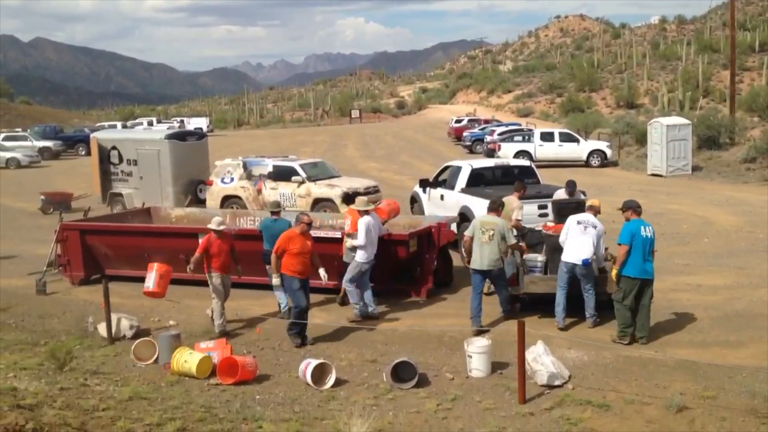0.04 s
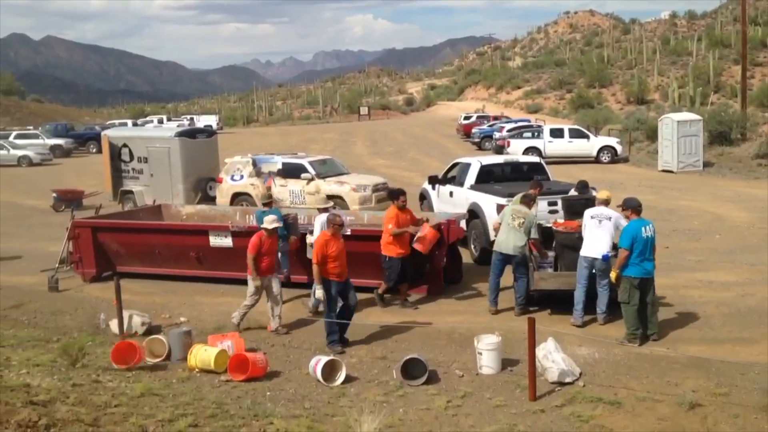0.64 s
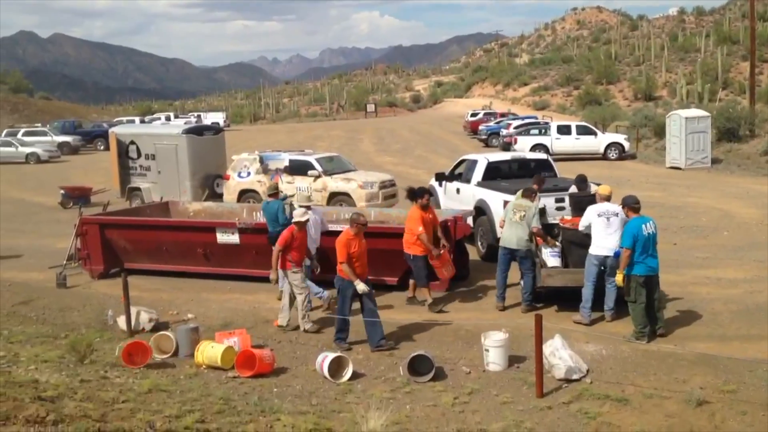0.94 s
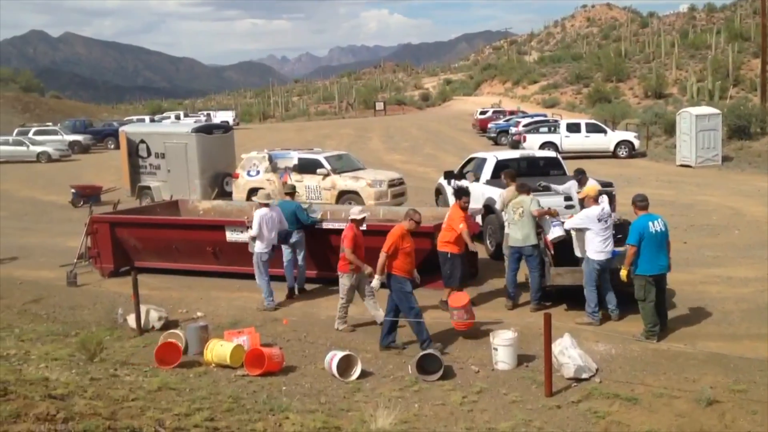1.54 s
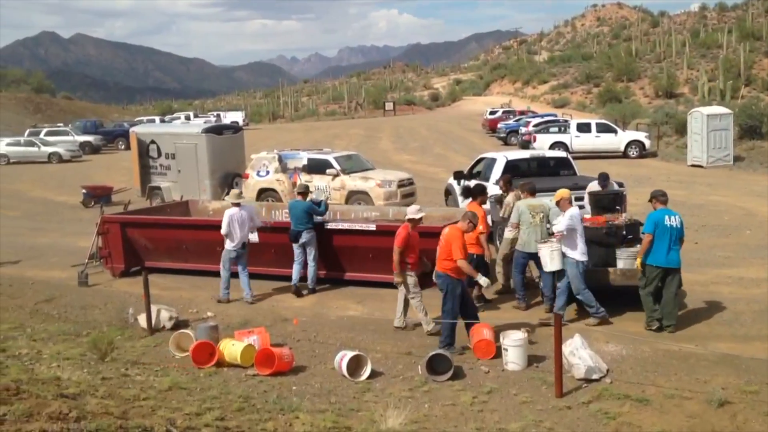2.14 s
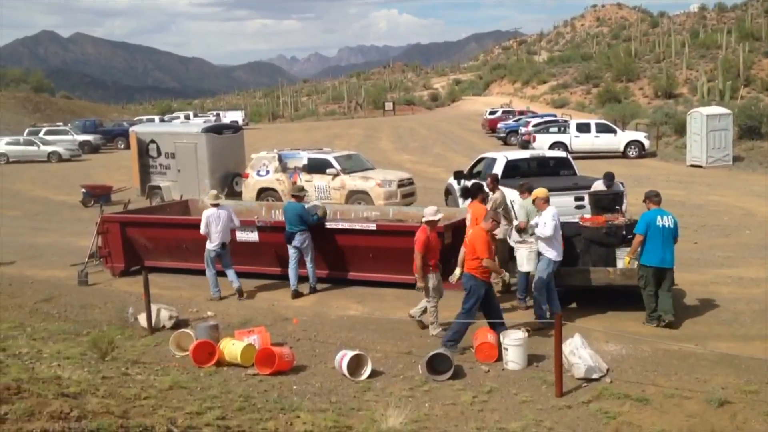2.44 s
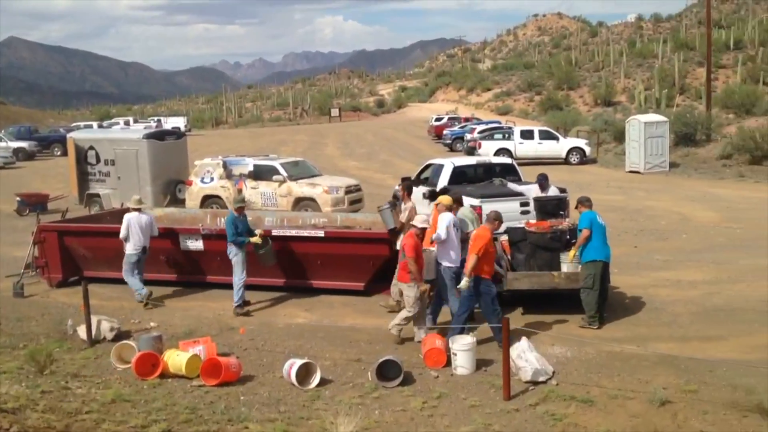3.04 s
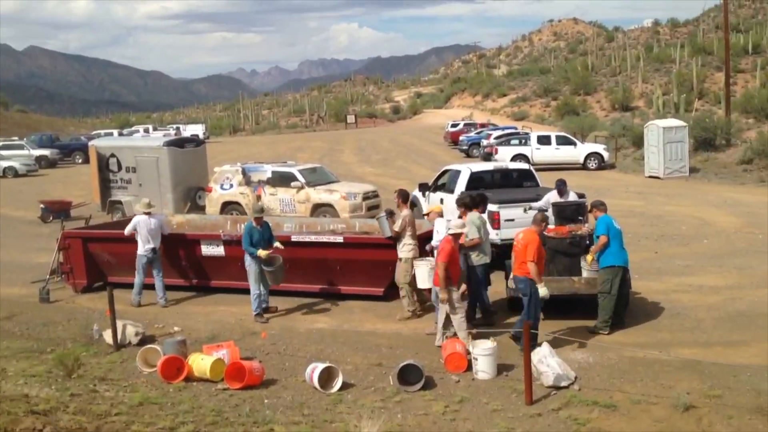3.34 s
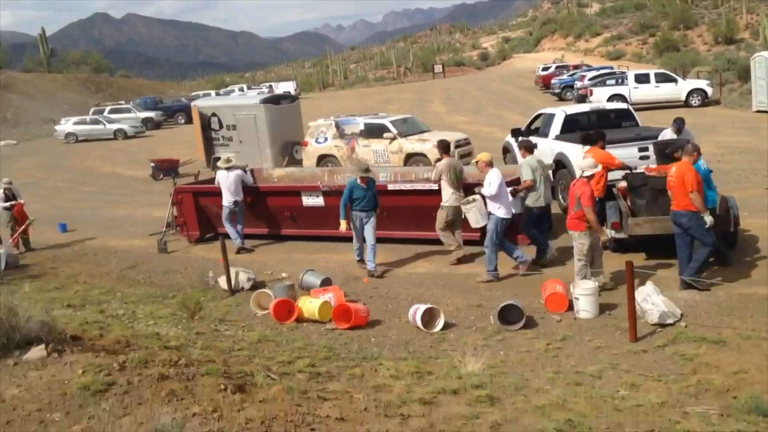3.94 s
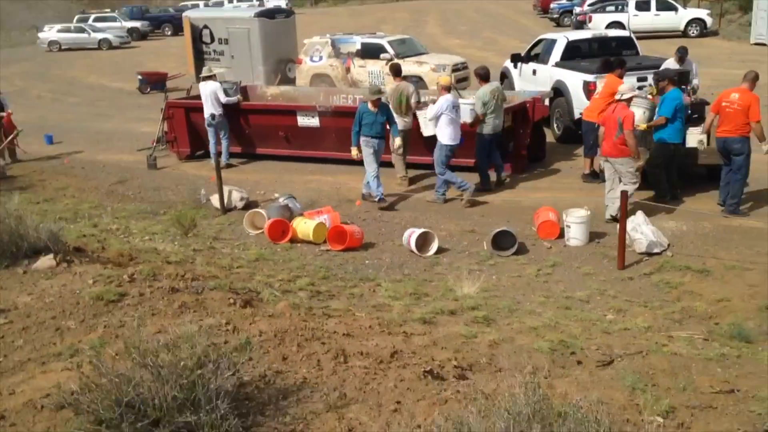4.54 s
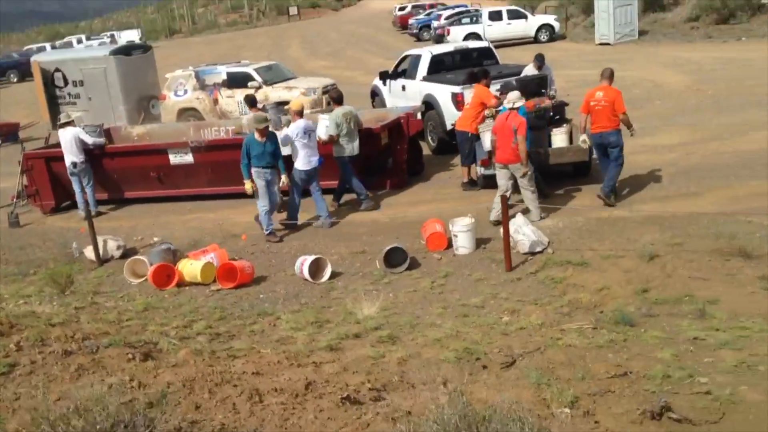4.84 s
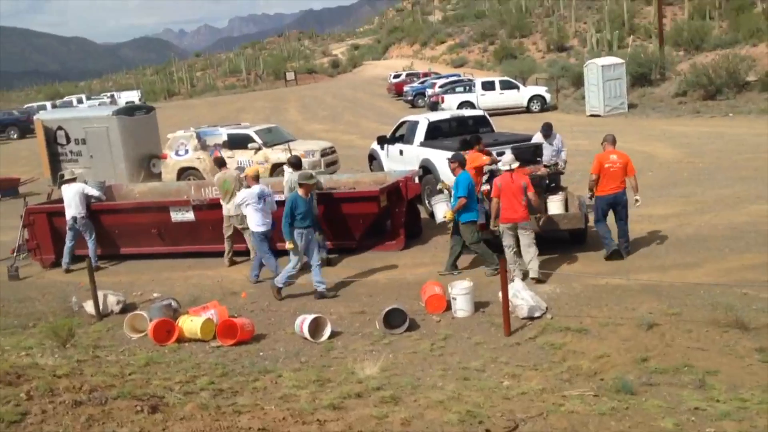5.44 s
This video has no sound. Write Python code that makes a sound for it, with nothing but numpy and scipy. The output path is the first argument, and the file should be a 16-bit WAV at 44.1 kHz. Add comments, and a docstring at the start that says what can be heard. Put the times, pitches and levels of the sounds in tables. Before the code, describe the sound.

Buckets of broken glass and trash are tipped into a metal dumpster outdoors, with clattering crashes, hollow thumps and light wind.

```python
"""Emptying buckets into a dumpster

An open dirt lot. Some way off, people tip plastic buckets of broken glass and trash into a steel
dumpster. Buckets bang on the rim and boom hollowly, the walls ring, trash rattles down and shards
slide and clink. Close up, a light wind rumbles and pops on the one microphone."""
import sys
import numpy as np
from scipy import signal
from scipy.fft import rfft, irfft
from scipy.io import wavfile
from scipy.ndimage import uniform_filter1d

SR = 44100
rng = np.random.default_rng(int(sys.argv[2]) if len(sys.argv) > 2 else 0)


def unload_audio(sound):
    """Save the sound as a 16-bit wav file, at the path given as the first command line argument."""
    columns = np.transpose(np.atleast_2d(sound))
    # keep every value between -1 and 1, then stretch to whole-number steps
    steps = np.round(np.clip(columns, -1, 1) * 32767)
    wavfile.write(sys.argv[1], SR, steps.astype(np.int16))


N = 246959
TIME = np.arange(N) / SR
AGE = np.arange(SR // 2) / SR  # seconds since a blow
GLASS, TRASH = 0, 1


def gain_of(db):
    """Decibels to gain."""
    return 10 ** (np.asarray(db) / 20)


def evened(x):
    """Scales to an rms of 1."""
    return x / np.sqrt(np.mean(x ** 2) + 1e-20)


def peaked(x, size=256):
    """Scales so that the loudest few milliseconds have an rms of 1."""
    return x / np.sqrt(uniform_filter1d(x ** 2, size).max() + 1e-20)


def tone(hz):
    """One undamped mode, set going by a blow."""
    return np.sin(2 * np.pi * hz * AGE)


def fade(t60):
    """Free decay after a blow, 60 dB down in t60 seconds."""
    return np.exp(-np.log(1000) * AGE / max(t60, 1e-3))


def add(mix, s, sound):
    """Mixes a sound in at time s."""
    part = mix[max(round(s * SR), 0):][:len(sound)]
    part += sound[:len(part)]


def band(x, lo, hi, order=4):
    """Causal band-pass from lo to hi Hz."""
    return signal.sosfilt(signal.butter(order, [lo, hi], "band", fs=SR, output="sos"), x)


def colour(x, spectrum, size=8192):
    """Minimum-phase filter through rows of f/Hz, gain/dB."""
    hz, db = np.transpose(spectrum)
    bin_hz = abs(np.fft.fftfreq(size, 1 / SR))
    log_gain = np.log(gain_of(np.interp(np.log(bin_hz + 1), np.log(hz + 1), db)))
    taps = np.fft.ifft(np.exp(signal.hilbert(log_gain).conj())).real[:size // 2]
    return signal.fftconvolve(x, taps)[:len(x)]


def drift(per_s):
    """Slow random wander of rms 1."""
    rolloff = 1 + (np.fft.rfftfreq(N, 1 / SR) / per_s) ** 4
    return evened(irfft(rfft(rng.standard_normal(N)) / rolloff, N))


def patter(per_s, spread_db):
    """Random tiny impacts, mostly small and a few large."""
    hits = (rng.random(N) < per_s / SR) * rng.choice([-1, 1], N)
    return hits * gain_of(spread_db * np.minimum(rng.exponential(1, N), 3.5))


def air(level_db=-63):
    """The steady, faint background of the open lot."""
    # spectrum of the open air: f/Hz, level/dB
    spectrum = [(18, -41), (30, -7), (77, 4), (197, -6.5), (410, -21), (656, -22.5), (830, -26),
                (970, -10.5), (1510, -22), (1820, -16.5), (2620, -22), (12300, -28), (15500, -27)]
    return gain_of(level_db) * evened(colour(rng.standard_normal(N), spectrum))


def breeze(lull_db=-72.5):
    """Strength of the wind: bell-shaped gusts over a steady breath of air."""
    # gusts at the microphone: crest t/s, half length/s, level/dB
    gusts = [(0.063, 0.1, -54), (0.567, 0.36, -53), (1.366, 0.091, -56), (1.822, 0.24, -54),
             (2.312, .1, -58), (3.077, 0.067, -57.5), (4.11, 0.24, -56.5), (4.681, 0.15, -50),
             (5.275, 0.28, -59.5), (5.575, 0.16, -60)]
    power = sum(gain_of(db) ** 2 * np.exp(-2 * ((TIME - s) / half_s) ** 2) for s, half_s, db in gusts)
    return np.sqrt(gain_of(lull_db) ** 2 + power)


def wind(gain_db=5.5):
    """Low rumble on the microphone that follows the breeze, in soft buffets with lulls between."""
    # spectrum of the rumble: f/Hz, level/dB
    spectrum = [(12, -27), (20, -40), (54, -2), (81, -3), (145, -5.5), (255, -18), (354, -22), (414, -33),
                (492, -44), (600, -24.5), (780, -39), (1320, -120)]
    buffets = np.minimum(gain_of(4.5 * drift(per_s=13)), 2)
    rumble = colour(rng.standard_normal(N) * buffets, spectrum)
    return gain_of(gain_db) * breeze() * evened(rumble)


def thumps(lead_s=0.037, lean_rad=0.067, tail_t60=0.13):
    """Wind pops on the microphone and a few dull bucket thuds: one pressure swing, then a noisy tail."""
    # low thumps: t/s, level/dB, centre f/Hz
    pulses = [(0.13, -29, 136), (0.144, -30.5, 122), (.216, -34.5, 130), (0.457, -27.5, 108),
              (0.469, -26, 61), (0.514, -28.5, 190), (.56, -35, 68), (0.873, -35, 97), (1.036, -29, 105),
              (1.038, -27.5, 346), (1.349, -37.5, 90), (1.518, -38, 78.7), (2.144, -23, 100),
              (2.389, -34.5, 99), (2.985, -43.5, 96), (3.5, -44.5, 92.3), (3.793, -41.5, 108),
              (4.191, -33, 79.6), (4.61, -15, 102), (4.61, -16.5, 334), (4.663, -26.5, 128),
              (4.849, -44, 90), (4.923, -35, 99), (5.148, -37, 142), (5.222, -32.5, 78.6),
              (5.366, -35.5, 73.7), (5.495, -34, 99.7)]
    out = np.zeros(N)
    for s, db, hz in pulses:
        swing = (np.exp(1j * lean_rad) / (1 - 1j * np.pi * hz * (AGE - lead_s)) ** 3).real
        tail = evened(band(rng.standard_normal(len(AGE)), hz / 2, 2 * hz, order=2)) * fade(tail_t60)
        tail_db = -14.5 - 5 * np.log2(hz / 100)  # higher thumps leave less
        add(out, s - lead_s, gain_of(db) * swing)
        add(out, s, gain_of(db + tail_db) * tail)
    return band(out, 50, 900, order=3)


def lot(x, echo_db=-16, t60=0.3, build_s=0.0053):
    """Adds faint scattered echoes from the dumpster, the parked vehicles and the slope."""
    scatter = band(rng.standard_normal(len(AGE)), 216, 7600, order=1)
    tail = scatter * fade(t60) * (1 - np.exp(-AGE / build_s))
    return x + gain_of(echo_db) * signal.fftconvolve(x, tail / np.linalg.norm(tail))[:N]


def poured(kind):
    """Flow of GLASS or TRASH: each load swells steadily, then dies away."""
    # loads sliding out of a bucket: t/s, swell/s, settling t60/s, glass level/dB, trash level/dB
    pours = [(0, 0.008, 0.99, -72, -48.5), (0.343, 0.034, 0.59, -53.5, -33.5), (.58, 0.16, 2.2, -66, -53),
             (.93, 0.27, 1, -63.5, -57), (1.308, 0.051, 4.6, -59.5, -57.5), (1.699, 0.16, 0.64, -51, -44.5),
             (1.92, 0.083, 1.63, -55.5, -46.5), (2.12, 0.054, 0.87, -70, -42), (2.86, 0.26, 0.74, -88, -64),
             (3.52, 0.096, 0.83, -63.5, -58), (3.98, 0.091, 2.46, -64.5, -56), (4.72, 0.21, 1, -69.5, -55),
             (5.32, 0.02, 2.5, -61.5, -55.5), (5.48, 0.089, 1, -63.5, -53)]
    handling_db = {GLASS: -79, TRASH: -68}  # faint stir of carried buckets between pours
    power = gain_of(handling_db[kind]) ** 2
    for start, swell_s, t60, *levels_db in pours:
        age = TIME - start
        swell = np.clip(age / swell_s, 0, 1)
        settle = np.exp(-np.log(1000) * np.maximum(age - swell_s, 0) / t60)
        power = power + (gain_of(levels_db[kind]) * swell * settle) ** 2
    return np.sqrt(power)


def tumble(gain_db=-3):
    """Clumps of small dull impacts as the trash settles."""
    # spectrum of tumbling trash: f/Hz, level/dB
    spectrum = [(210, -1), (350, -4), (516, 2.5), (706, 1), (800, 3), (1120, -0.5), (1560, 0.5), (2050, 0),
                (2630, -12), (3260, -10), (5180, -12.5), (6100, -17), (7000, -40), (9100, -68),
                (15400, -120)]
    hits = patter(per_s=1400, spread_db=3) * gain_of(3.2 * drift(per_s=25))
    return gain_of(gain_db) * poured(TRASH) * evened(colour(hits, spectrum))


def slide(clump_db=2, count=90):
    """Many shards, damped by the heap, tick against each other over a gritty scrape."""
    # tone colour of sliding glass: f/Hz, gain/dB
    spectrum = [(1470, -19.5), (2500, 5.5), (2660, -3.5), (3240, -3), (5280, -6.5), (6110, -6.5),
                (6900, -5), (11800, -12.5), (15500, -22)]
    rings = np.zeros(N)
    for hz in rng.uniform(2778, 14000, count):
        shard = tone(hz) * fade(rng.uniform(.012, .06))
        rings += signal.oaconvolve(patter(per_s=22, spread_db=3), shard[:SR // 10])[:N]
    grit = evened(rings) + 1.6 * evened(patter(per_s=2500, spread_db=4))
    clumps = gain_of(clump_db * drift(per_s=33))
    return poured(GLASS) * evened(colour(grit * clumps, spectrum))


def glints(gain_db=6, spread_db=2, t60=.07, lo_hz=5000, hi_hz=13000, count=45):
    """Loose shards ring out over the slide, more often and louder the faster the glass flows."""
    flow, out = poured(GLASS), np.zeros(N)
    fallen = np.cumsum(flow ** 1.5)
    for when, pitch, softness in rng.random((count, 3)):
        at = np.searchsorted(fallen, when * fallen[-1])
        ring = tone(lo_hz * (hi_hz / lo_hz) ** pitch) * fade(t60)
        add(out, at / SR, flow[at] * gain_of(gain_db + spread_db * np.log(1 - softness)) * ring)
    return out


def clinks(gain_db=-5, overtone_ratio=1.3, overtone_db=-15, flight_s=.032, flight_shrink=.8):
    """A shard rings in a beating pair of modes and an inharmonic overtone at each quickening bounce."""
    # dropped shards: t/s, level/dB, f/Hz, t60/s, change per bounce/dB
    shards = [(1.228, -56, 3710, .05, -24.5), (1.320, -56, 7800, 0.18, -20), (1.477, -61, 4514, .1, -10.5),
              (1.959, -39.5, 4760, 0.058, -25), (1.96, -42.5, 5960, .09, -25),
              (2.073, -37.5, 8900, .054, -21.5), (2.405, -32.5, 6370, 0.022, -27),
              (4.023, -31, 3970, 0.074, -38), (5.353, -50.5, 6490, 0.079, -3.5),
              (5.383, -50, 4440, 0.099, 1), (5.514, -53, 7860, .15, -10), (5.525, -51.5, 5300, .09, -17),
              (5.530, -51.5, 9050, .14, -12), (5.533, -55, 11650, .14, -10)]
    out = np.zeros(N)
    for s, db, hz, t60, bounce_db in shards:
        beat_hz = 70 * rng.uniform(0.71, 1.9)
        ring = tone(hz) + .5 * tone(hz + beat_hz) + gain_of(overtone_db) * tone(hz * overtone_ratio)
        for k in range(3):
            add(out, s, gain_of(db + gain_db + k * bounce_db) * ring * fade(t60))
            s += flight_s * flight_shrink ** k
    return out


def steel(x, ring_db=-14):
    """The dumpster's walls ring on after whatever hits them."""
    # modes of the steel walls: f/Hz, level/dB, t60/s
    wall_modes = [(684, 0, .3), (803, 0, .3), (845, -4, .25), (943, -4, .25), (1222, 0, .3), (1351, -5, .3),
                  (1475, 0, .3), (1750, -2, .25), (1840, -2, .3), (1925, -4, .25), (2034, 0, .3),
                  (2068, -3, .3), (2165, -5, .25), (2218, -5, .3), (2368, 0, .3), (2457, 1, .3),
                  (2490, 1, .3), (3277, -1, .25), (3403, -1, .25), (3597, -1, .25), (3980, 1, .25)]
    ring = sum(gain_of(db) * fade(t60) * np.cos(2 * np.pi * hz * AGE) for hz, db, t60 in wall_modes)
    return x + gain_of(ring_db) * x.std() * evened(signal.fftconvolve(x, ring)[:N])


def own_modes(lo_hz, hi_hz, count=40):
    """Every piece of trash has its own scatter of resonances, here a quarter of a second long."""
    hz = np.exp(rng.uniform(np.log(lo_hz), np.log(hi_hz), count))
    cycles = hz[:, None] * AGE[:SR // 4] + rng.random((count, 1))
    return evened(np.sin(2 * np.pi * cycles).sum(0))


def contact(clang_db, weight_db, bright_db, t60, height, rise_s, crush_t60=0.034):
    """A brief gritty crush; then the piece rings and scatters between the walls."""
    # edges of the body, clang, crack and splinter bands: f/Hz
    edges = [380, 1400, 2600, 6000, 15500]
    # tone colour of a knock: f/Hz, gain/dB
    spectrum = [(240, -19.5), (400, -7.5), (452, 0), (527, 0.5), (715, -2), (860, 4), (1150, -2.5),
                (1240, -2.5), (1660, -2), (2090, 3.5), (2630, -9.5), (3510, -7), (5480, -19),
                (13900, -36.5), (15500, -45)]
    # the ground echo lifts the bass and cancels the low mids of a sound at rim height: f/Hz, gain/dB
    ground_dip = [(330, 7), (500, -13.5), (690, -15), (870, -0.5)]
    crack_db = -5.5 + 13.5 * np.tanh(bright_db / 14.5)  # follows the brightness, then levels off
    levels_db = clang_db - 1 + np.array([weight_db, 0, crack_db, bright_db - 15.5])
    lives = t60 * np.geomspace(1, 0.85, len(levels_db))  # the treble dies sooner
    grit = rng.standard_normal(len(AGE)) * rng.exponential(1, len(AGE)) ** 0.71
    ring = np.zeros(len(AGE))
    add(ring, 0, .5 * own_modes(600, 7000))
    scatter = gain_of(-3) * (.7 * grit + ring)
    give = 1 - np.exp(-(AGE + 1 / SR) / rise_s)  # soft things take longer to load
    sound = np.zeros(len(AGE))
    for k, (db, life) in enumerate(zip(levels_db, lives)):
        force = grit * fade(crush_t60) + scatter * fade(life)
        force[0] += 4
        part = band(colour(force * give, spectrum), *edges[k:k + 2])
        sound += gain_of(db) * peaked(part)
    return colour(sound, [(hz, db * height) for hz, db in ground_dip])


def scrapes(rise_s=0.0081):
    """Buckets and loads drag over the rim or the ground: contacts that swell slowly."""
    # drags: t/s, clang level/dB, body over clang/dB, brightness/dB, t60/s, height (0 ground, 1 rim)
    drags = [(.297, -58.5, 4.5, 2, 0.39, 1), (.826, -56, -0.5, -2, 0.13, 0.72),
             (1.142, -56, -1.5, 3, 0.29, 0.91), (1.223, -54.5, -13, 3, 0.14, 0.88),
             (2.123, -42, 3.5, -5, 0.15, 0.24), (2.735, -62, 3, 4, 0.051, 1), (3.045, -63, 3, -6, 0.063, 1),
             (3.24, -62.5, 4, -4, .08, 1), (3.855, -60.5, 21, 6, 0.24, 0.17),
             (4.133, -41.5, -1, -7, .17, 0.35), (4.275, -56.5, -14, 9, 0.23, 1),
             (4.455, -47, 0.5, 2.5, 0.13, 0.35), (4.767, -49, 0, 0, 0.19, 1),
             (4.884, -64.5, -1, 3, 0.18, 1), (4.985, -64, 2, 7, 0.093, 0.88),
             (5.188, -65, 5.5, 8, 0.19, 0.73)]
    out = np.zeros(N)
    for s, *drag in drags:
        add(out, s, contact(*drag, rise_s))
    return out


def knocks():
    """Buckets and trash strike; harder, brighter knocks load faster."""
    # blows: t/s, clang level/dB, body over clang/dB, brightness/dB, t60/s, height (0 ground, 1 rim)
    blows = [(.055, -54.5, 11.5, 4, 0.035, 0), (.079, -58.5, 3, 14, 0.048, 0),
             (.109, -60, 16.5, 10, 0.035, 0), (.244, -58, 5, 6.5, 0.15, 0.68),
             (.350, -30.5, -7, -3.5, 0.36, 1), (.374, -29, -1.5, -0.5, 0.098, 0.97),
             (.386, -43, -18, 13, 0.19, 0.96), (.413, -35, -3, 1.5, 0.13, 1),
             (.587, -38.5, 0, 3.5, 0.11, 1), (.610, -40.5, 5.5, 2, 0.13, 1),
             (.629, -48.5, -11, 6.5, 0.17, 0.85), (.672, -44, 3, 0, 0.064, 0.9),
             (.720, -43.5, 4, -2.5, 0.26, 0.94), (0.779, -45.5, 1.5, 5, 0.083, 1),
             (0.922, -54, 2, 4, 0.4, 0.18), (.962, -61.5, 7, 21, 0.18, 0.37),
             (1.02, -52, 0.5, -14, 0.29, 0.35), (1.590, -49, 0.5, 7.5, 0.34, 0.95),
             (1.705, -34, 4.5, 2.5, 0.074, 1), (1.713, -34, 3.5, 2, 0.29, 1),
             (1.739, -32.5, -4, 5.5, 0.11, 0.96), (1.751, -35, 3.5, -1, 0.087, 1),
             (1.767, -35.5, -2.5, -8, 0.023, 1), (1.808, -50, 4, 5.5, .12, 0.37),
             (1.972, -57.5, 12.5, 12, 0.16, 0), (2.070, -47.5, 4.5, 2, 0.21, 1),
             (2.138, -45, 11, 5.5, 0.093, 0), (2.147, -54, 17, 22, 0.16, 0),
             (2.183, -43, 6.5, -21, 0.12, 1), (2.198, -54, 9.5, -12, 0.39, 1),
             (2.251, -46, 6.5, -5, 0.24, 1), (2.279, -50, 5.5, -4, 0.15, 1),
             (2.314, -47.5, 3.5, -3, 0.099, 0.65), (2.404, -56.5, -5, 34, 0.17, 0.52),
             (2.447, -44.5, -1.5, -10, 0.055, 0.29), (2.578, -35, -6, 4, 0.12, 0.29),
             (3.015, -57, 2, 1, 0.033, 0.92), (3.076, -64.5, 12, 1, 0.024, 1),
             (3.684, -62.5, 15.5, 14.5, 0.081, 0.47), (3.734, -60, 6.5, 4, 0.029, 0.43),
             (3.886, -41, 0, -0.5, 0.45, 1), (3.921, -35, 1, -0.5, 0.13, 0.89),
             (3.944, -42, 2.5, 2.5, .13, 0), (3.975, -43.5, 3, -5, 0.16, 1),
             (4.023, -42, -11, 15.5, 0.12, 0), (4.093, -48.5, -3, -19, 0.57, 0.82),
             (4.157, -41, -0.5, 3, .14, 0), (4.304, -49.5, 2.5, -1.5, 0.096, 0.33),
             (4.454, -46.5, 0.5, 9.5, 0.052, 0.15), (4.739, -54, 5.5, 8, 0.2, 0.32)]
    out = np.zeros(N)
    for s, clang_db, weight_db, bright_db, t60, height in blows:
        rise_s = 0.0013 * 2 ** ((-38 - clang_db - bright_db) / 25)
        add(out, s, contact(clang_db, weight_db, bright_db, t60, height, rise_s))
    return out


def rim(t60=.035, rise_s=0.00051):
    """The stiff rim gives a short ping from a close pair of modes."""
    # hard blows on the dumpster's rim: t/s, level/dB, f/Hz
    blows = [(0.3511, -21, 2008), (0.3542, -27, 2150), (0.3755, -23, 2170), (0.3870, -28, 1940),
             (1.8885, -37, 2090), (2.171, -30, 1940), (2.198, -29, 1887), (2.2090, -31, 1902),
             (2.2513, -29, 1840), (2.3150, -33.5, 1810)]
    out = np.zeros(N)
    for s, db, hz in blows:
        ping = (tone(hz) + .5 * tone(hz * 1.07)) * fade(t60)
        add(out, s, gain_of(db) * ping * (1 - np.exp(-AGE / rise_s)))
    return out


def booms(rise_s=0.0064, flex_db=-16):
    """The bottom and wall of a bucket swing in a few low modes, with a noisy flexing of the plastic."""
    # blows on a hollow bucket: t/s, level/dB, pitch f/Hz, t60/s, lift of the bottom's mode/dB
    blows = [(.388, -34.5, 244.3, 0.13, -0.5), (.409, -31, 238, 0.039, 0), (0.612, -47, 227, 0.1, -3),
             (1.038, -48, 262.4, .1, 2), (1.632, -37, 192, 0.083, 15), (1.706, -31, 258, 0.14, 11),
             (1.728, -26.5, 174.4, 0.13, -1), (1.751, -29, 165, 0.092, -11),
             (2.138, -22.5, 230.4, 0.095, 17), (2.248, -43, 232, 0.081, -5), (2.447, -47.5, 277, .11, -3),
             (2.579, -48.5, 309, 0.051, 3), (3.11, -51, 278, 0.034, -5), (3.885, -17.5, 220.9, .17, 3.5),
             (3.946, -28.5, 232, 0.068, -6), (4.085, -38, 246, 0.098, -11), (4.156, -36.5, 191.5, .088, 2)]
    # modes of a bucket, the bottom's first: multiple of the pitch, level/dB, multiple of the t60
    bucket_modes = [(.68, -17, 1), (0.982, 1, 0.84), (1.149, -5, 0.85), (1.418, -10, 1.08),
                    (2.2, -12, 0.25), (2.85, -9, 0.28), (3.15, -19.5, 0.63), (3.8, -9, 0.18)]
    attack = 1 - np.exp(-AGE / rise_s)
    out = np.zeros(N)
    for s, db, hz, t60, bottom_db in blows:
        modes = sum(gain_of(mode_db + bottom_db * (k == 0)) * fade(t60 * share) * tone(hz * ratio)
                    for k, (ratio, mode_db, share) in enumerate(bucket_modes))
        flex = evened(band(rng.standard_normal(len(AGE)), .6 * hz, 1.45 * hz, order=3)) * fade(t60)
        add(out, s, gain_of(db) * peaked((modes + gain_of(flex_db) * flex) * attack))
    return out


def scene():
    """The work at the dumpster heard across the lot, with open air and wind at the microphone."""
    dumpster = steel(knocks() + scrapes() + rim() + tumble())
    background = air()
    work = dumpster + booms() + clinks() + glints() + slide()
    return (lot(work) + background + wind() + thumps())[None]


def record(dry, edge_hz=15450):
    """The recorder's band limit."""
    lowpass = signal.firwin(511, edge_hz, window=("kaiser", 8), fs=SR)
    return signal.oaconvolve(dry, lowpass[None], "same")


dry = scene()
out = record(dry)
unload_audio(out)
```